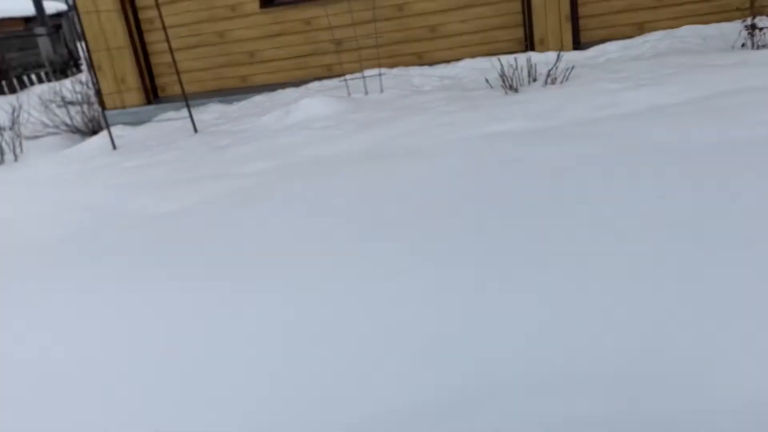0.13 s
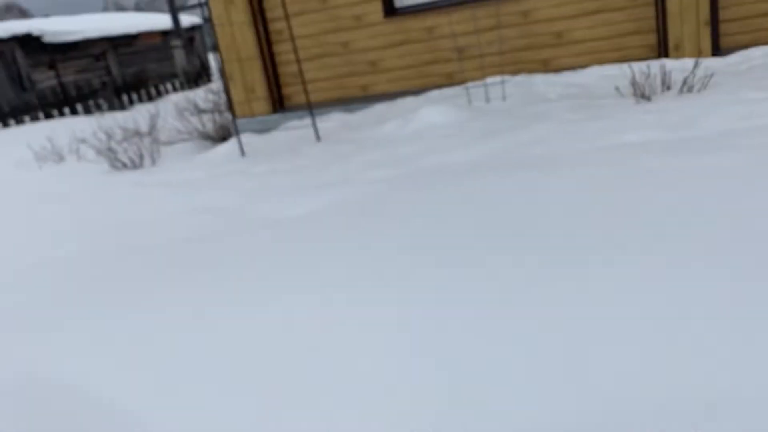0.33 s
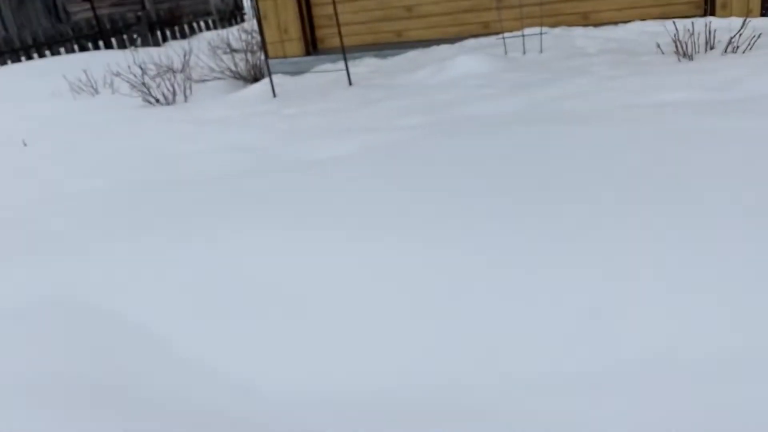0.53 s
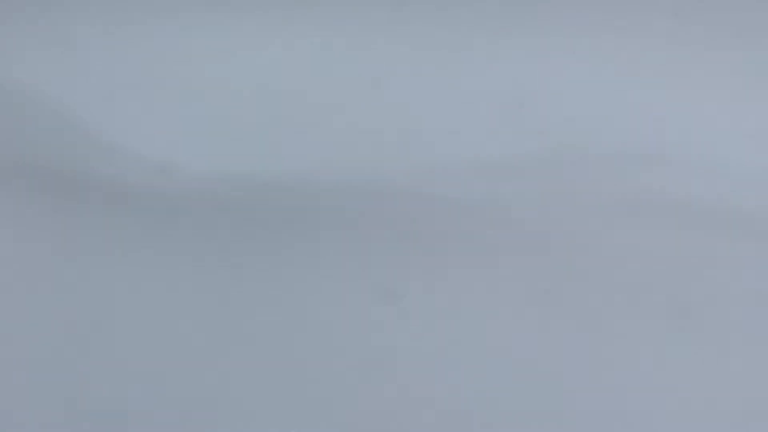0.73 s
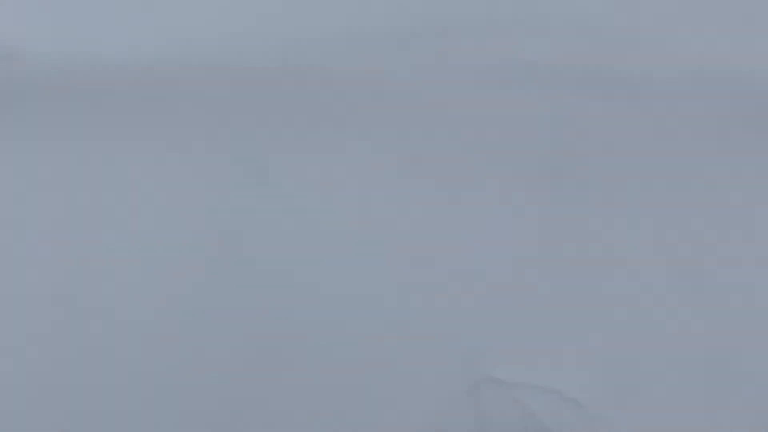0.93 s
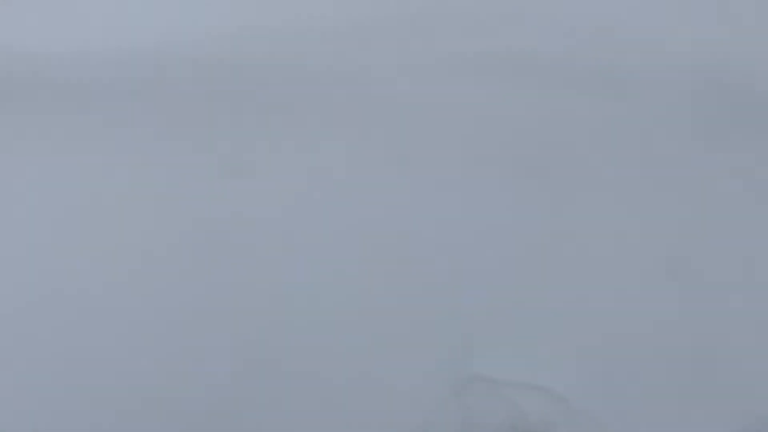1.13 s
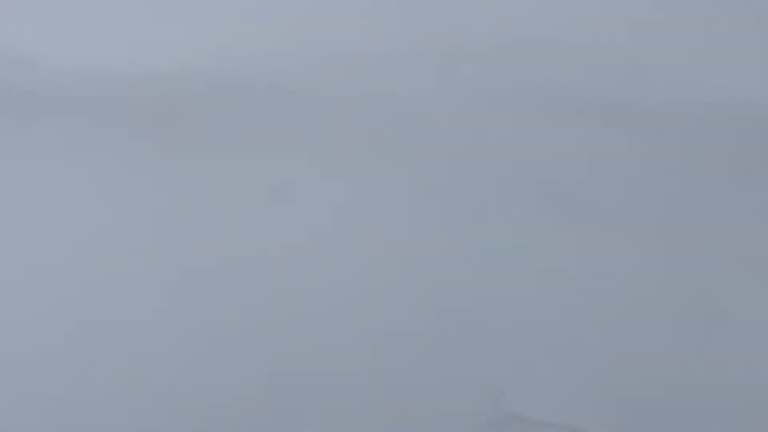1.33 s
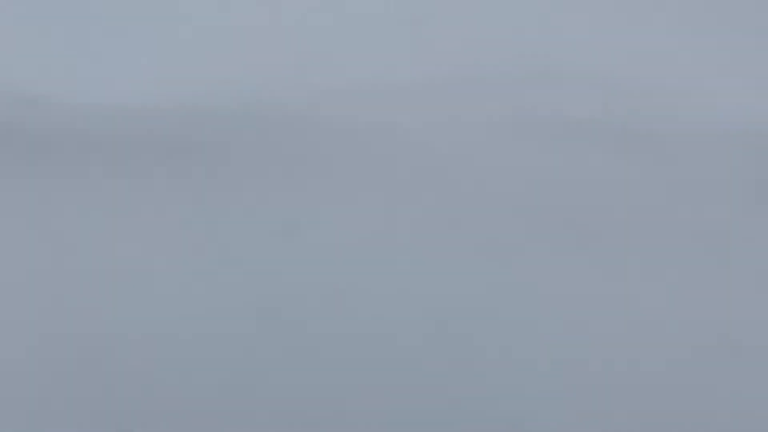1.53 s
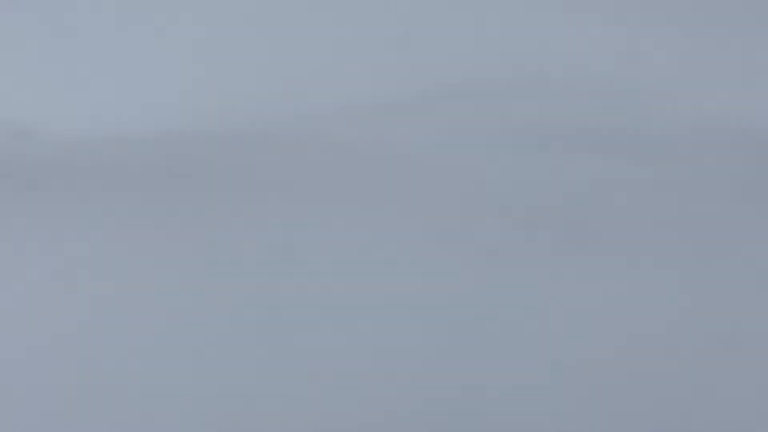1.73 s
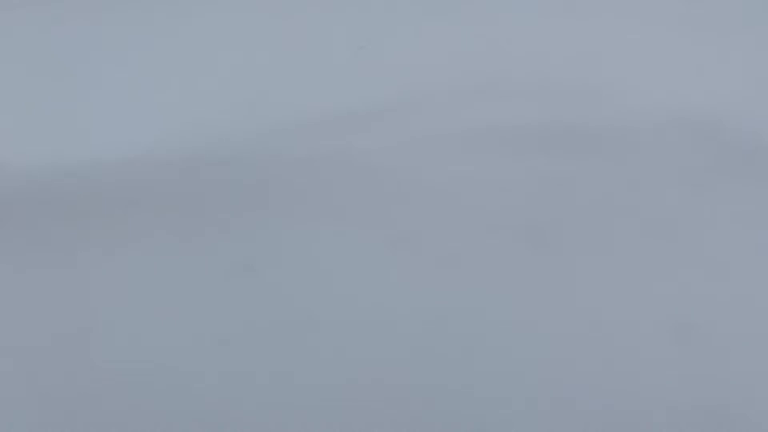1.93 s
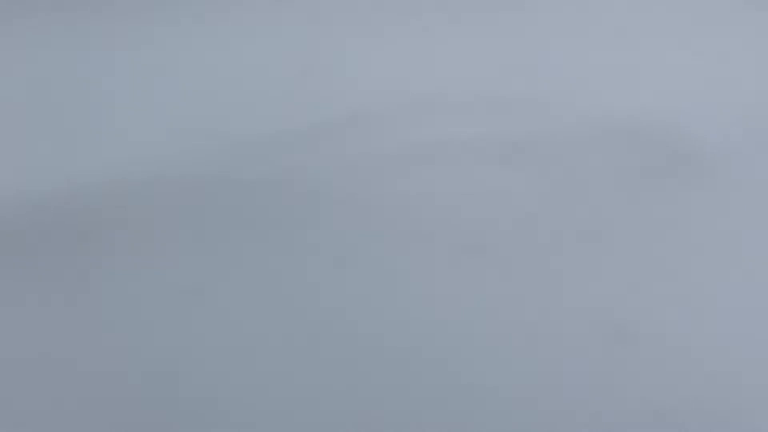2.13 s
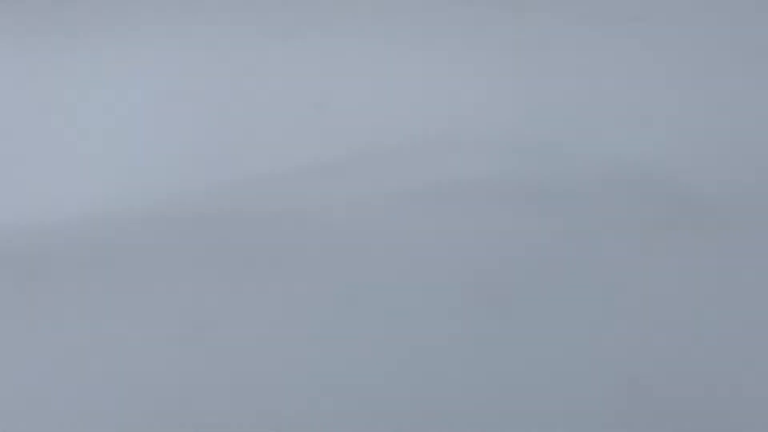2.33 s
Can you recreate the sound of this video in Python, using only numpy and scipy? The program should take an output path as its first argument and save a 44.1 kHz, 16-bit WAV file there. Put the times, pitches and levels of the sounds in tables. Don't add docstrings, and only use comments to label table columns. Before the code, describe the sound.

Quick, irregular footsteps crunch through deep dry snow, with fizzing powder and low groaning as it packs. Heavy low thumps and wind rumble hit the close handheld stereo microphone around one second; the open garden is quiet.

```python
import sys
import numpy as np
from scipy import signal
from scipy.fft import rfft, irfft, next_fast_len
from scipy.io import wavfile
from scipy.ndimage import uniform_filter1d, map_coordinates

SR = 44100
rng = np.random.default_rng(int(sys.argv[2]) if len(sys.argv) > 2 else 0)


def amplitude_ratio(level_db):
    exponent = np.asarray(level_db, float) / 20
    return 10 ** exponent


def master_out(mix):
    frames = np.transpose(np.atleast_2d(mix))
    ceiling = np.clip(frames, -1, 1)
    pcm = np.round(ceiling * 32767).astype(np.int16)
    wavfile.write(sys.argv[1], SR, pcm)


N = 110250


def unit(x):
    return x / np.sqrt(np.mean(x ** 2) + 1e-20)


def along(points, hz):
    f, v = np.transpose(points)
    return np.interp(np.log(hz + 1), np.log(f + 1), v)


def wobble(rate):
    knots = rng.standard_normal(int(N * 200 / SR))
    return map_coordinates(knots, [np.arange(N) * rate / SR])


def filtered(x, response):
    n = x.shape[-1]
    m = next_fast_len(n + 4096)
    return irfft(rfft(x, m) * response(np.fft.rfftfreq(m, 1 / SR)), m)[..., :n]


def stroke(start, peak, end):
    t = np.arange(N) / SR
    rising = t < peak
    u = np.where(rising, (t - start) / (peak - start), (end - t) / (end - peak))
    roundness = np.where(rising, 0.97, 0.64)
    return np.sin(np.clip(u, 0, 1) * np.pi / 2) ** roundness


def grit(rate, spread_db, dust):
    hit = rng.random((2, N)) < rate / SR
    size_db = spread_db * np.minimum(rng.exponential(size=(2, N)), 3)
    size = amplitude_ratio(size_db) * rng.choice([-1, 1], (2, N))
    return unit(hit * size) + dust * rng.standard_normal((2, N))


def pair(alike):
    u = np.arccos(np.clip(alike, 0, 1)) / 2
    return np.cos(u), np.sin(u)


def packing(strokes, rate, spread_db, dust, width, coarse_hz, alike, lumpy_db, lumps):
    # (frequency [Hz], level [dB])
    snowpack = [(350, 2), (650, -2.5), (1050, 1), (1650, -1.5), (2300, 2), (3500, -3)]
    out = np.zeros((2, N))
    c, d = pair(alike)
    bed = grit(rate, spread_db, dust)
    for start, peak, end, db, hz in strokes:
        i, j = max(int(start * SR), 0), min(int(end * SR), N)
        g = np.roll(bed, rng.integers(N), 1)[:, i:j]
        band = width * hz * min(hz / coarse_hz, 1)

        def ring(f):
            resonance = (1j * f * band / (hz * hz - f * f + 1j * f * band)) ** 2
            return resonance * amplitude_ratio(along(snowpack, f))

        both = filtered(np.array([c * g[0] + d * g[1], c * g[0] - d * g[1]]), ring)
        out[:, i:j] += amplitude_ratio(db) * unit(both) * stroke(start, peak, end)[i:j]
    return out * amplitude_ratio(lumpy_db * wobble(lumps))


def crunch():
    # (start [s], peak [s], end [s], level [dB], grain pitch [Hz])
    crunches = [(-.1, .04, .15, -46.5, 1250), (.14, .19, 0.32, -51.5, 1330), (.22, .39, 0.41, -54, 1720),
                (.475, .49, 0.53, -50.5, 1200), (.49, .53, 0.65, -56, 1500), (.57, .64, 0.71, -55, 1900),
                (.67, .69, 0.81, -50, 1400), (.72, .75, 0.83, -52.5, 1500), (.787, .8, 0.88, -40, 900),
                (.86, .9, 1.03, -53.5, 1290), (1.006, 1.014, 1.03, -50, 645),
                (.94, 1.02, 1.02, -57.5, 2200), (1.04, 1.1, 1.23, -51.5, 1520),
                (1.14, 1.22, 1.384, -52, 1210), (1.378, 1.41, 1.51, -46.5, 1570),
                (1.43, 1.505, 1.523, -39, 1440), (1.49, 1.575, 1.593, -44.5, 1510),
                (1.62, 1.7, 1.725, -48, 1190), (1.72, 1.77, 1.905, -47, 1200),
                (1.84, 1.89, 1.964, -48, 1320), (1.93, 1.96, 2.05, -50.5, 2070),
                (1.96, 2.055, 2.07, -43.5, 920), (2.14, 2.15, 2.34, -54.5, 900),
                (2.17, 2.215, 2.286, -42.5, 939.8), (2.235, 2.27, 2.295, -46.5, 1020),
                (2.27, 2.315, 2.39, -47.5, 1140), (2.3, 2.39, 2.47, -51, 1900),
                (2.42, 2.44, 2.5, -49.5, 2100), (2.47, 2.5, 2.63, -49.5, 1101)]
    return packing(crunches, 2000, 4.1, 1.0, width=1.57, coarse_hz=1200, alike=0.76, lumpy_db=1.0, lumps=60)


def groan():
    # (start [s], peak [s], end [s], level [dB], grain pitch [Hz])
    groans = [(.1, .18, 0.43, -54.5, 220), (.47, .497, 0.563, -50, 271), (.7, .75, 0.8, -48.5, 326),
              (.78, .81, .89, -41.5, 272), (1.003, 1.018, 1.02, -44, 307), (.86, .91, 0.96, -50.5, 216),
              (1.15, 1.19, 1.17, -50, 248), (1.57, 1.64, 1.65, -56.5, 200), (1.4, 1.5, 1.614, -45, 283),
              (1.66, 1.725, 1.828, -45, 206), (1.8, 1.88, 1.96, -46.5, 194.4),
              (1.96, 2.066, 2.09, -46.5, 306), (2.07, 2.11, 2.29, -52.5, 125),
              (2.22, 2.34, 2.33, -51.5, 154.4), (2.42, 2.44, 2.48, -56, 167.8)]
    return packing(groans, 400, 2.3, 1.18, width=1.34, coarse_hz=150, alike=0.93, lumpy_db=1.76, lumps=45)


def fizz():
    # (start [s], peak [s], end [s], level [dB])
    fizzes = [(-.1, 0.045, 0.28, -51.5), (0.164, 0.39, 0.425, -56), (0.478, 0.492, 0.6, -54),
              (0.564, 0.613, .68, -54.5), (0.669, 0.68, .73, -52.5), (0.707, 0.722, .76, -53),
              (0.735, 0.745, .768, -46.5), (0.762, 0.821, .85, -46), (0.831, 0.863, .93, -45),
              (0.914, 0.938, .995, -55), (1.01, 1.09, 1.18, -47), (1.132, 1.196, 1.26, -48),
              (1.23, 1.236, 1.38, -57), (1.374, 1.397, 1.46, -54), (1.412, 1.485, 1.55, -48),
              (1.508, 1.57, 1.606, -52.5), (1.61, 1.732, 1.74, -52), (1.72, 1.763, 1.92, -49.5),
              (1.804, 1.97, 2.01, -51), (1.96, 2.034, 2.08, -49.5), (2.134, 2.152, 2.19, -57),
              (2.154, 2.225, 2.33, -51), (2.23, 2.355, 2.425, -52.5), (2.402, 2.443, 2.53, -57),
              (2.464, 2.5, 2.6, -54)]
    # (start [s], peak [s], end [s], level [dB])
    flake_falls = [
        (0.094, 0.153, 0.17, -56),
        (.74, .75, .765, -58),
        (1.255, 1.27, 1.295, -51),
        (1.914, 1.954, 2.0, -70),
    ]
    # (frequency [Hz], level [dB per Hz])
    powder_colour = [(700, -0.5), (2300, -4.5), (3500, -2.5), (6500, -0.5), (9000, -3.5), (13000, -3.5),
                     (16000, -5.5)]
    # (frequency [Hz], likeness [0 to 1])
    likeness = [(2000, 0.69), (2900, 0.27), (3500, .6), (4000, 0.43), (5200, 0.11), (6500, .99)]
    sift_db, flake_hz = -66.5, 9500
    port_lag_s, in_step_hz = .000243, 6950

    def ports(hz):
        c, s = pair(along(likeness, hz))
        side = np.exp(-1j * np.pi * port_lag_s * (hz - in_step_hz) * (hz > 5200))
        return amplitude_ratio(along(powder_colour, hz)) * np.array([[c * side, c / side], [s * side, -s / side]])

    z = signal.stft(grit(4000, 5.4, 1.75), nperseg=256)[2]
    field = uniform_filter1d(rng.standard_normal(z.shape[1:]), size=14, axis=0)
    field = uniform_filter1d(field, size=12, axis=1)
    grains = signal.istft(z * amplitude_ratio(1.48 * unit(field)), nperseg=256)[1][:, :N]
    grains = unit(filtered(grains[:, None], ports).sum(0))
    treble = filtered(grains, lambda hz: hz ** 4 / (hz ** 4 + flake_hz ** 4))

    power = sum((amplitude_ratio(db) * stroke(a, p, b)) ** 2 for a, p, b, db in fizzes)
    force = np.sqrt(amplitude_ratio(2 * sift_db) + power)
    flakes = sum(amplitude_ratio(db) * stroke(a, p, b) for a, p, b, db in flake_falls)
    unsteady = amplitude_ratio(5.5 + 0.2 * wobble(40.05) + 0.68 * wobble(120))
    return (force * grains + flakes * treble) * unsteady


def bearing(x):
    # (frequency [Hz], left leads by [rad], left over right [dB])
    ahead = [(150, .2, 1), (1400, 0.48, -3.5), (3000, 0.34, 1.5), (5000, .4, 5.5), (6540, 0, 0)]
    behind = [(150, -1.1, -4), (452, -0.9, -8.5), (824, -3, -4), (1200, -2.5, -9), (2200, -2.5, -2),
              (3650, -6.5, 4), (5200, -4.5, 7.5), (6500, -2 * np.pi, 1)]
    to_left = [(150, 0, -2.5), (450, 0.33, 0.5), (1080, 1.0, 4), (1860, 2, -6.5), (2280, 3.5, 0),
               (3050, 6, 8), (3600, 7, 6.5), (5500, 2 * np.pi, 0)]
    to_right = [(150, 0.11, -5), (610, -1.73, -5), (900, -1.05, -9.5), (1400, -1.43, -6), (2720, -1.54, 2),
                (3500, 0.74, 6), (4500, -0.43, 6.5), (6600, 0.061, 0.6)]
    stances = [(-1, ahead), (0.18, behind), (0.92, to_left), (1.26, to_right)]  # (from [s], side)
    change_s = 0.025

    def ports(hz, table):
        f, lead, pan_db = np.transpose(table)
        gain = amplitude_ratio(along(np.c_[f, pan_db], hz) / 2)
        return np.array([gain * np.exp(1j * along(np.c_[f, lead], hz)), 1 / gain])

    t, out = np.arange(N) / SR, 0
    for start, table in stances:
        share = np.clip((t - start) / change_s + .5, 0, 1)
        out = out * (1 - share) + share * filtered(x, lambda hz: ports(hz, table))
    return out


def thumps():
    jolts = [(.02, -44.5, 91, 2.2), (0.067, -42, 70, 1), (0.3, -44, 80, 0.98), (.62, -40, 63.7, 1.14),
             (0.821, -35.5, 65, 1.6), (0.485, -35, 272, 0.63), (0.668, -38, 65, 0.92),
             (.685, -26.5, 70.6, 1.93), (0.684, -34.5, 396, 1.7), (0.732, -33, 76, 0.67),
             (0.747, -31.5, 79, 1.4), (.763, -27, 98.5, 0.56), (.776, -25, 160, 1.05),
             (.871, -19, 88, 1.07), (0.915, -25.5, 100, 0.65), (0.969, -32.5, 85, 1.9),
             (1.005, -31.5, 71.5, 1.65), (1.022, -28, 98, 0.43), (1.032, -27, 95, 0.96),
             (1.052, -34, 64, 1), (1.096, -34, 65, 0.88), (1.116, -22.5, 119, 0.89),
             (1.13, -25.5, 67, 1.13), (1.191, -36.5, 111, 0.51), (1.206, -31, 60, 1.35),
             (1.287, -37, 72.4, 1.51), (1.318, -41, 59.5, 0.87), (1.41, -46, 110, 1),
             (1.551, -28, 181, 0.52), (1.56, -42, 60, 1), (1.7, -50, 64.4, 1.2), (1.722, -37.5, 150, 2.8),
             (1.755, -40, 190, 0.61), (1.79, -38, 159.8, 1.2), (1.811, -37.5, 187, 0.95),
             (1.839, -39.5, 150, 1.8), (1.866, -39, 160, 1), (1.89, -39, 198, 1.1), (1.92, -46, 67, 1.5),
             (2.03, -45.5, 65, 1), (2.074, -37.5, 200, 0.57), (2.1, -48, 90, 1), (2.12, -43, 100, 1),
             (2.149, -32.5, 324, 0.75), (2.311, -38.5, 150, 1.1), (2.395, -45.5, 112, 1.2)]
    t, out = np.arange(N) / SR, np.zeros((2, N))
    skews = rng.standard_normal((len(jolts), 2))
    for (start, db, hz, cycles), skew in zip(jolts, skews):
        for k in range(2):
            u = (t - start) * hz - 0.049 * skew[k]
            swing = np.cos(2 * np.pi * (u - 0.06 * u * u))
            fade = np.exp(-(u / cycles) ** 2 * 1.53)
            out[k] += amplitude_ratio(db + 1.23 * skew[1 - k]) * swing * fade
    return out


def air():
    # (time [s], level [dB])
    gusts = [(0, -56.5), (.2, -59), (.38, -59), (.43, -66), (.5, -56), (.59, -62.5), (.66, -47.5),
             (1.3, -51), (1.36, -70), (1.62, -65.5), (1.7, -68), (1.86, -58.5), (2.05, -54.5), (2.2, -64),
             (2.5, -59)]
    # (frequency [Hz], level [dB per Hz])
    rumble_colour = [(12, -98), (20, -49), (48, -10.5), (70, -1), (116, -4.5), (236, -16), (300, -27),
                     (390, -63), (660, -120)]
    s, db = np.transpose(gusts)
    c, d = pair(.55)
    a, b = filtered(rng.standard_normal((2, N)), lambda hz: amplitude_ratio(along(rumble_colour, hz)))
    lumpy = amplitude_ratio(1.5 * wobble(6.8))
    rumble = unit(np.array([c * a + d * b, c * a - d * b]) * lumpy)
    return rumble * amplitude_ratio(np.interp(np.arange(N) / SR, s, db) + 4.5)


def hush():
    # (frequency [Hz], level [dB per Hz])
    hush_colour = [(100, -11.5), (150, -10.5), (280, -13), (650, -17), (2000, -23), (5000, -34),
                   (7000, -40)]
    noise = rng.standard_normal((2, N))
    return amplitude_ratio(-56.5) * unit(filtered(noise, lambda hz: amplitude_ratio(along(hush_colour, hz))))


def scene():
    boots = crunch() + groan() + fizz()
    return bearing(boots) + thumps() + air() + hush()


def roll_off(x):
    return signal.sosfilt(signal.butter(12, 17070, fs=SR, output="sos"), x)


def record(dry):
    top_hz = 15850
    mix = filtered(dry, lambda hz: hz < top_hz)
    return roll_off(mix)


dry = scene()
out = record(dry)
master_out(out)
```